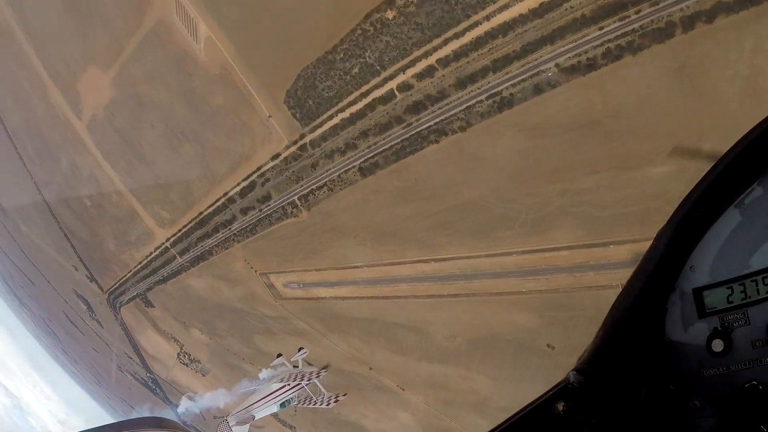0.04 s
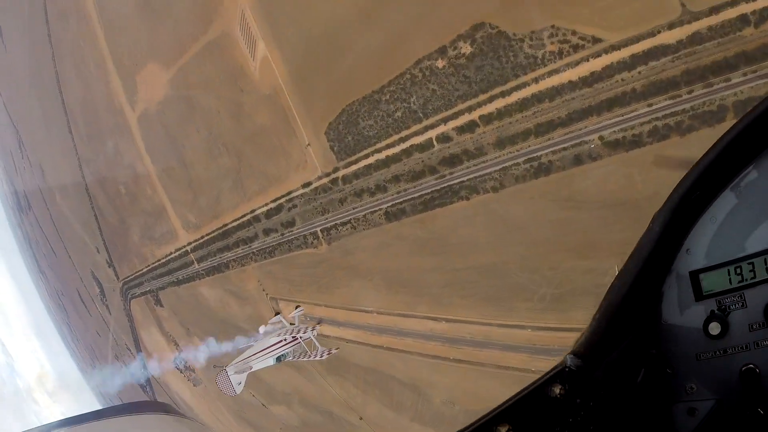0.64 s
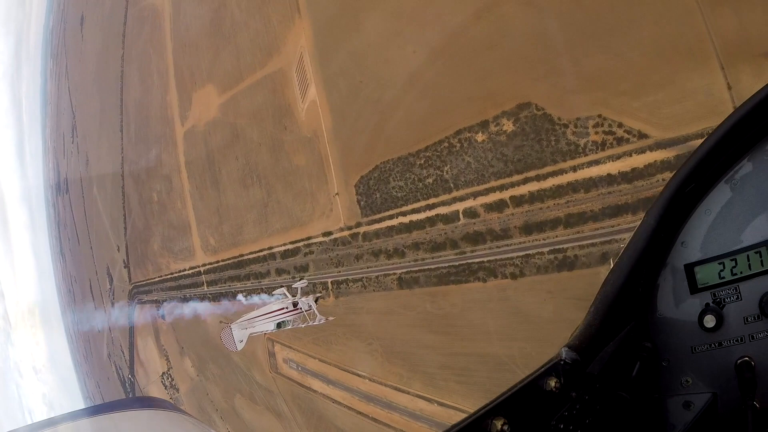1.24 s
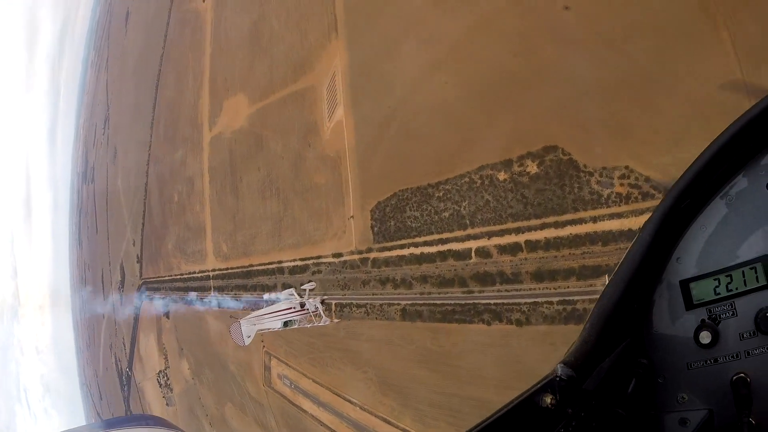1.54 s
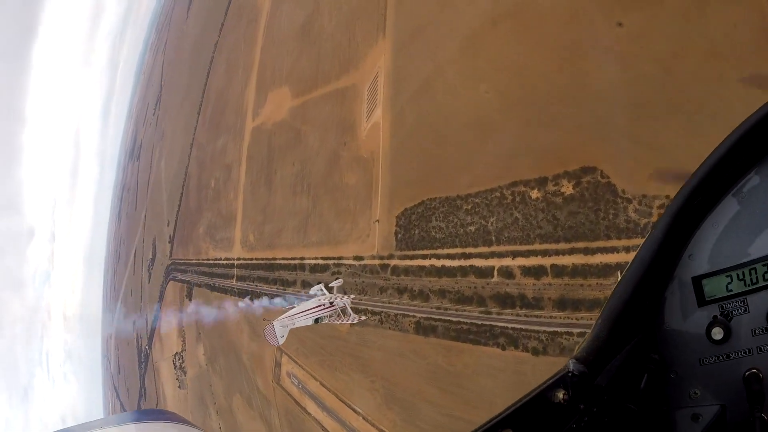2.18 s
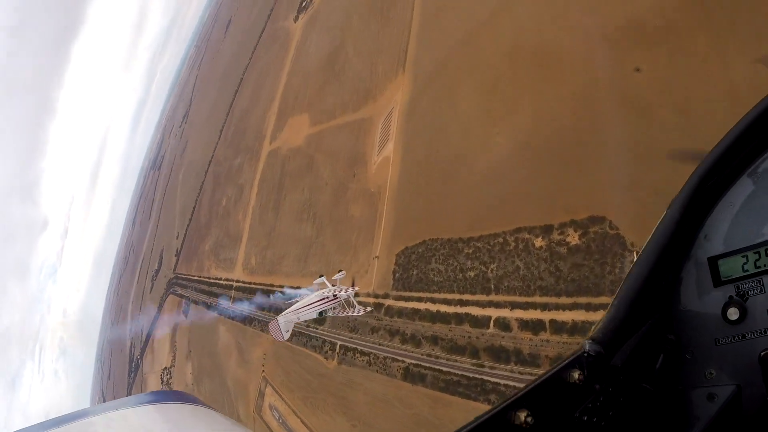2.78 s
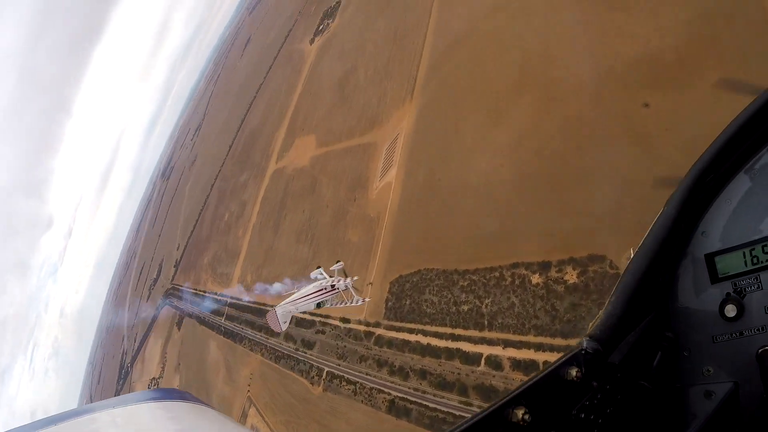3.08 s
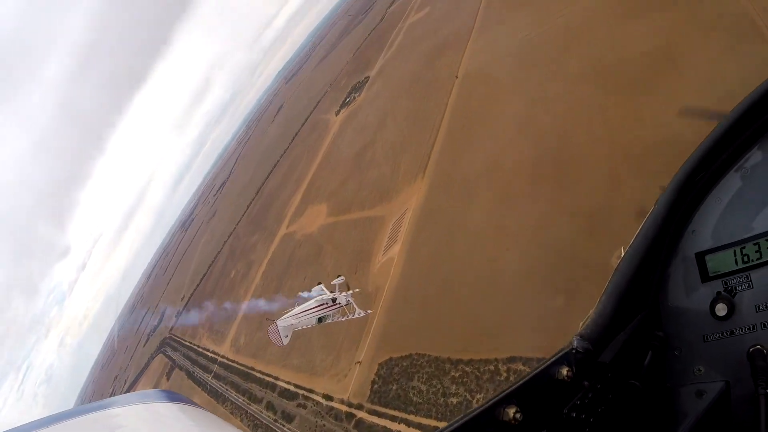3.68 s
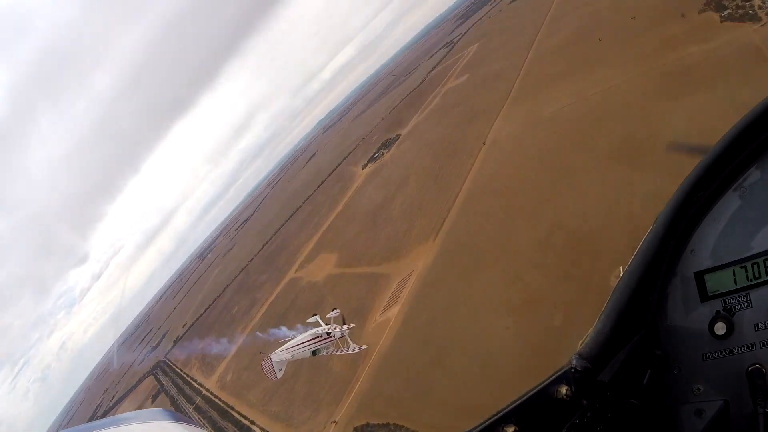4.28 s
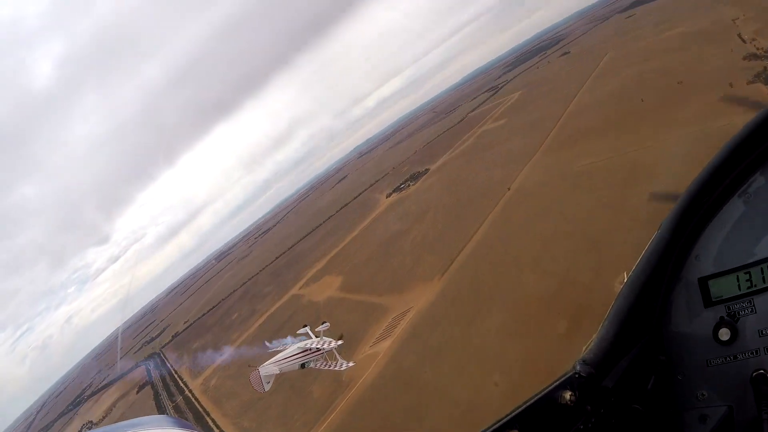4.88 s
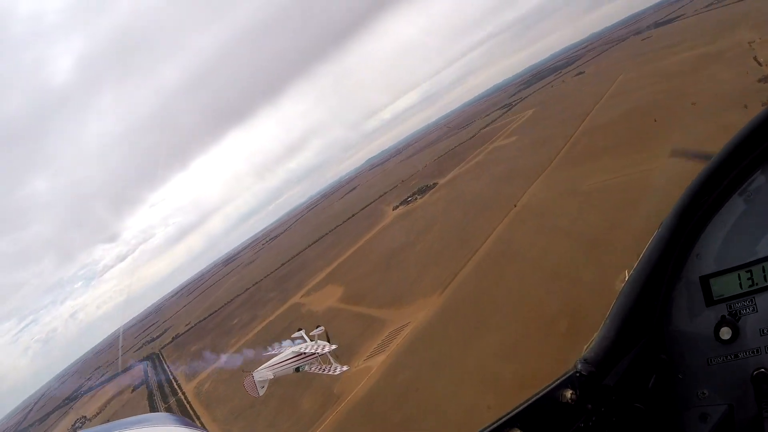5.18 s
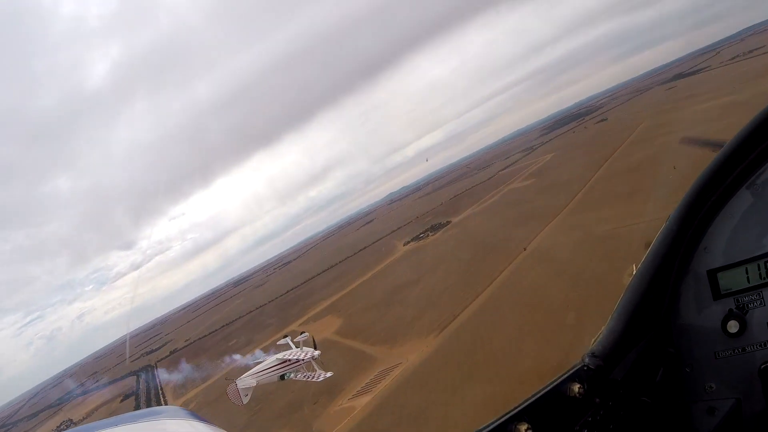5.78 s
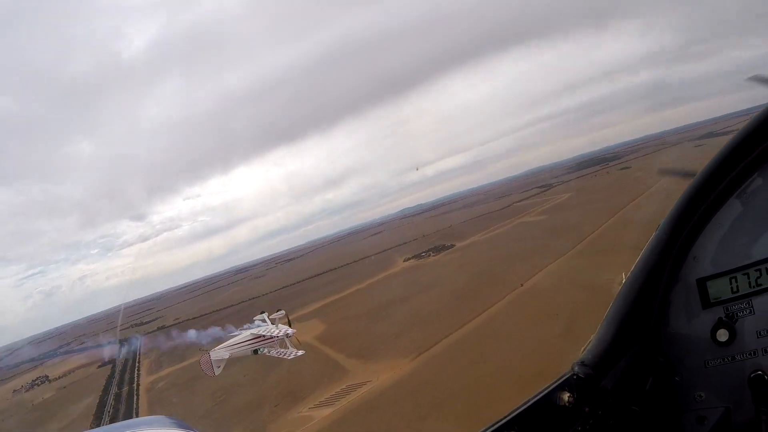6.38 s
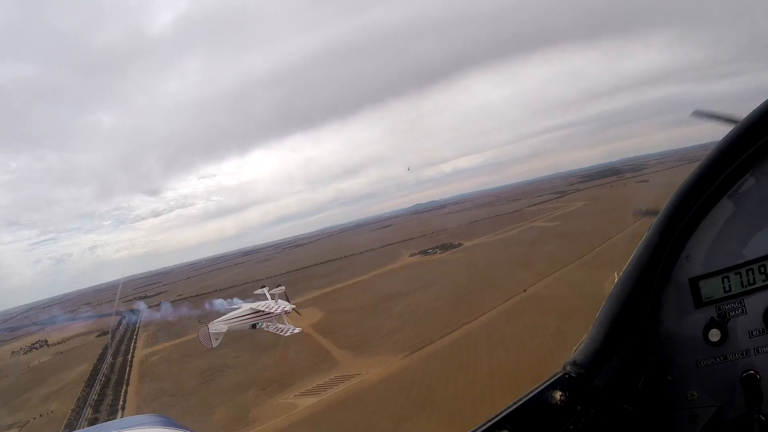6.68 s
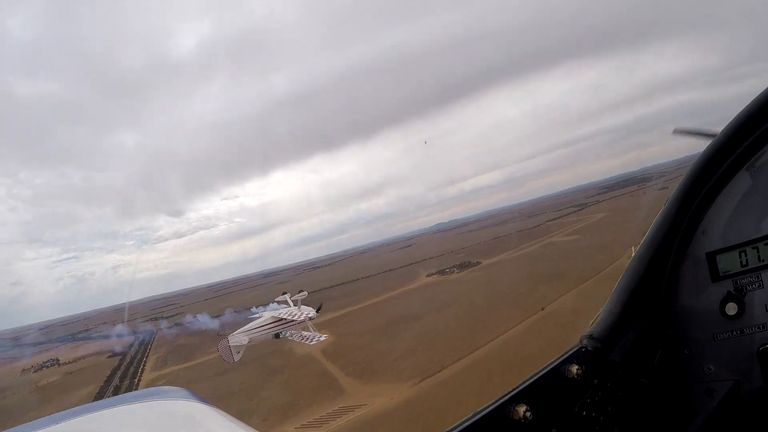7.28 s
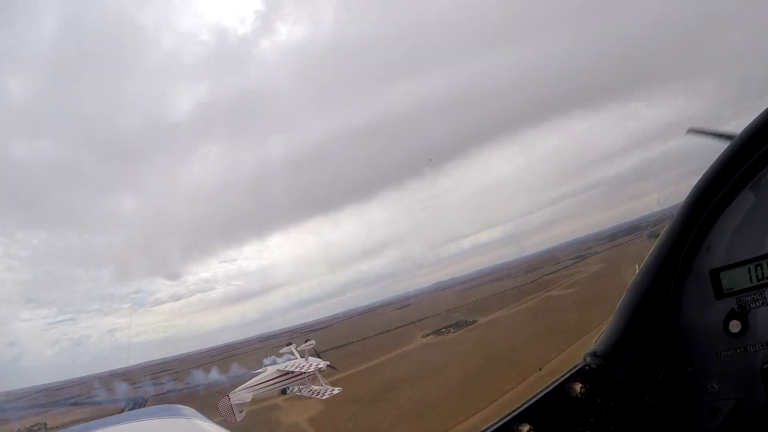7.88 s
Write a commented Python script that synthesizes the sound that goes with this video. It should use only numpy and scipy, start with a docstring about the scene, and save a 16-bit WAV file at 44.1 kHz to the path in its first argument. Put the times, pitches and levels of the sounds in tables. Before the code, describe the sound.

Inside the closed cockpit of a small aerobatic plane, a loud, low engine and propeller drone runs throughout, drifting gently down and up in pitch. Around it sits the close, steady roar of air over the fuselage and a raspy rush along the canopy. Turbulence thickens the rumble near the start and again near the end, while a high hiss of leaking air rises midway and stays.

```python
"""A piston engine and propeller drone in the closed cockpit of a light aerobatic aircraft in a roll.
Their tones are orders of one shaft, whose speed sags and recovers; uneven firings rumble in the cabin.
Turbulence buffets the fuselage, and the slipstream drives the resonances of the panels and canopy.
Air rushes from a vent and hisses through the canopy seal; a small camera limits the peaks."""
import sys
import numpy as np
from scipy import signal
from scipy.fft import rfft, irfft, next_fast_len
from scipy.io import wavfile
from scipy.ndimage import uniform_filter1d, minimum_filter1d, map_coordinates

SR = 44100
rng = np.random.default_rng(int(sys.argv[2]) if len(sys.argv) > 2 else 0)


def transcribe(u):
    """Save the signal u as a 16-bit wav file named by the first command-line argument.

    u: samples, shape (n,) or (channels, n), limited to [-1, 1]; the rate is SR.
    q: integer samples, one column per channel.
    """
    v = np.clip(np.atleast_2d(u).T, -1, 1)
    q = np.round(v * 32767).astype(np.int16)
    wavfile.write(sys.argv[1], SR, q)


N = 355005

# rotation frequency of the crankshaft: t/s, f/Hz
SHAFT_SPEED = [(0.0, 45.28), (0.2, 44.85), (0.95, 47.3), (1.4, 44.18), (1.85, 44.78), (2.25, 44.54),
               (2.5, 43.25), (3.05, 46.77), (3.25, 47.32), (3.55, 46.94), (4.2, 44.76), (4.45, 44.92),
               (4.95, 46.12), (5.6, 44.62), (6.45, 47.26), (7.15, 47.56), (7.6, 44.54), (8.05, 45.46)]
# turbulence shaking the airframe, and slipstream along it, relative to the usual: t/s, level/dB
TURBULENCE = [(0, -0.5), (0.6, 4.5), (1.3, -1.5), (2.05, -2.5), (2.75, -1.5), (3.2, 2), (3.5, -1),
              (3.9, 1.8), (4.45, -3), (5.25, 1), (5.6, -2.2), (6.05, 1.7), (6.6, -4), (7.2, -4), (7.45, 4),
              (7.62, -1.5), (7.88, 3.5), (8.05, 3)]
SLIPSTREAM = [(0, -2.3), (0.85, 1), (1.7, -2), (2.5, -2.5), (2.9, 1.5), (3.5, 2.7), (4.4, 1.8), (5.25, 2.5),
              (5.85, -0.8), (6.2, 0.5), (6.55, -2.2), (8.05, -1.3)]
# strong orders of the shaft: t/s, level/dB
BLADE_TONE = [(0.0, -15.5), (2.75, -13), (2.95, -16), (3.25, -26), (3.4, -18.5), (4.25, -13), (5.05, -16.4),
              (5.85, -11.6), (6.2, -20), (6.6, -16.5), (7.25, -16.4), (7.45, -29), (7.6, -16), (7.8, -17.5),
              (8.05, -35)]  # two blade passes a turn
THROB_TONE = [(0, -24), (0.65, -15), (1, -21), (2.3, -15.5), (2.45, -26), (2.85, -17.5), (3.25, -22.5),
              (4.1, -15), (5.6, -27.5), (6.8, -28), (7.35, -24), (8.05, -32)]  # half an order below the firings
FIRING_TONE = [(0, -22), (0.55, -25), (1.25, -10), (1.5, -16.5), (1.8, -13), (2.7, -22.5), (3.45, -12.5),
               (4, -18), (4.3, -13.5), (5.25, -16.5), (5.5, -13), (5.95, -19.5), (6.15, -10), (6.85, -11.5),
               (7.4, -15.5), (7.65, -13), (7.9, -19.5), (8.05, -14)]  # three firings a turn
SHARED_OVERTONE = [(0, -21), (0.7, -19.5), (1.2, -25), (1.65, -24.5), (2.35, -42), (3.3, -34), (3.7, -23.5),
                   (4.1, -26.5), (4.6, -22.5), (5.1, -40), (5.5, -22.5), (6.6, -23.5), (7.3, -30),
                   (8.05, -20.5)]  # common to blades and firings
BLADE_OVERTONE = [(0, -28), (0.45, -24), (0.8, -39), (8.05, -36)]  # fades early
# weak orders from cylinders that fire unequally: multiple of the shaft speed, level/dB
WEAK_ORDERS = [(.5, -43), (1.5, -28.5), (3.5, -28), (4.5, -28), (5, -31.5), (5.5, -37.5), (6.5, -31.5),
               (7, -37.5), (7.5, -34.5), (11, -38.5), (13, -38), (13.5, -37), (16, -42.5)]
# relative spectral densities of the noise sources: f/Hz, level/dB
EXHAUST_SPECTRUM = [(60, -33), (125, -6), (158, -1.5), (183, -0.5), (215, -1), (260, -6), (350, -12),
                    (460, -11), (700, -25), (1500, -58)]
BUFFET_SPECTRUM = [(8, -24), (22, -14), (44, -8), (64, -1), (85, -4.5), (125, -4.5), (170, -26), (300, -39)]
PANEL_SPECTRUM = [(150, -7.5), (330, -2), (520, -3), (640, -2.5), (680, -11.5), (820, -8), (1000, -8.5),
                  (1100, -16.5), (1400, -30), (2500, -50)]
CANOPY_SPECTRUM = [(700, -23), (1150, 2.5), (1250, 0.5), (1420, -3), (1950, 1), (2120, -5), (2500, -14.5),
                   (4500, -34.5)]
VENT_SPECTRUM = [(1000, -8.5), (2000, -2), (2550, -3), (2800, 0.5), (3250, -5.5), (3700, -7), (4500, -11.5),
                 (7000, -21), (11000, -35), (15000, -40)]
SEAL_SPECTRUM = [(2500, -35), (4700, -15), (5250, -3), (6000, -3), (6700, -0.5), (8200, -5), (9600, -14.5),
                 (11400, -27), (15000, -33)]
# resonances of the fuselage panels and the canopy: f/Hz, width/Hz, height above the spectrum/dB
PANEL_MODES = [(594, 53, 6), (626.5, 29, 4.5), (707, 28, 4.5), (877, 40, 4.5), (915, 66, 7), (973, 46, 4.5)]
CANOPY_MODES = [(1245, 58, 8.2), (1556, 38, 7.7), (1685, 40, 8.1), (1820, 45, 4), (1900, 50, 5.6),
                (2005, 45, 3.5), (2264, 99, 7.4), (2710, 90, 6.1), (2890, 90, 6.6), (3040, 80, 4)]
# rush from the vent, and hiss at the canopy seal: t/s, level/dB
VENT_RUSH = [(0, -33.5), (0.75, -32.5), (1.4, -39.2), (2.5, -38.2), (3, -34.8), (3.6, -35), (4.1, -37),
             (5.4, -37), (6.8, -38.5), (8.05, -36.6)]
SEAL_LEAK = [(0.0, -46), (0.8, -43.4), (1.5, -46), (3.5, -35), (3.7, -36), (5.1, -34.5), (6.8, -38.0),
             (8.05, -34.5)]
# jet through the seal: t/s, speed/usual speed
JET_SPEED = [(0, 0.92), (1.5, 0.96), (2.5, 0.935), (3.5, .98), (5, 1.02), (6.5, 1.036), (8.05, 1.01)]


def undb(db):
    """Amplitude ratio of a level in decibels."""
    return 10 ** (np.asarray(db) / 20)


def level(x, db=0):
    """Scaling to a given rms level."""
    return x * undb(db) / np.sqrt(np.mean(x ** 2))


def curve(table):
    """Linear interpolation of a time table at every sample."""
    return np.interp(np.arange(N) / SR, *np.transpose(table))


def walk(rate):
    """Slow random fluctuation of unit rms, with rate new values a second."""
    points = rng.standard_normal(2048)
    return level(np.interp(np.arange(N) / SR * rate, np.arange(len(points)), points))


def colour(x, spectrum, modes=()):
    """Source-filter shaping: a smooth spectrum with resonance peaks on top, at unit rms."""
    size = next_fast_len(N)
    f = np.maximum(np.arange(size // 2 + 1) * SR / size, 1)
    hz, db = np.transpose(spectrum)
    rolloff_db = 40 * np.log10(np.maximum(f / hz[-1], 1))
    gain_db = np.interp(np.log(f), np.log(hz), db) - rolloff_db
    for centre, width, boost in modes:
        gain_db += boost / (1 + (2 * (f - centre) / width) ** 2)
    return level(irfft(rfft(x, size) * undb(gain_db), size)[:N])


def order_tone(turns, order, lag_cycles, wobble_rad):
    """Phase modulation: turbulence perturbs a tone locked to a multiple of the shaft speed."""
    return np.sqrt(2) * np.sin(2 * np.pi * (order * turns - lag_cycles) + wobble_rad * walk(7))


def uneven_cylinders(turns, waver_db=3):
    """Half-order comb: unequal firings repeat once a four-stroke cycle, which takes two turns."""
    return sum(order_tone(turns, order, rng.random(), wobble_rad=0.28)
               * level(undb(waver_db * walk(4)), db) for order, db in WEAK_ORDERS)


def drone(turns, turbulence_db, flutter_db=0.83):
    """Periodic forcing: blades and firings radiate shaft orders; rough air adds shake and blade slap."""
    shake_db = -30 + 1.3 * turbulence_db
    slap_db = -26.5 + 0.65 * turbulence_db + 3 * walk(4)
    # order, level/dB, lag/cycles; the throb lags a quarter cycle, so it swirls rather than chugs
    orders = [(2, curve(BLADE_TONE), 0), (2.5, curve(THROB_TONE), 1 / 4), (3, curve(FIRING_TONE), 0),
              (1, shake_db, rng.random()), (4, slap_db, rng.random()),
              (6, curve(SHARED_OVERTONE), rng.random()), (8, curve(BLADE_OVERTONE), rng.random())]
    return sum(order_tone(turns, order, lag, wobble_rad=0.071) * undb(db + flutter_db * walk(12))
               for order, db, lag in orders)


def exhaust(turns, scatter=0.22, decay_cycles=0.58):
    """Pulse-modulated noise: three unequal bursts of gas a turn, dulled by the firewall."""
    firings = 3 * turns
    strength = 1 + scatter * rng.standard_normal(4096)[firings.astype(int)]
    bursts = strength * (0.5 + np.exp(-(firings % 1) / decay_cycles))
    return colour(bursts * rng.standard_normal(N), EXHAUST_SPECTRUM)


def turbulent_air(spectrum, flicker_db, flicker_hz):
    """Flow noise: turbulence gives a continuous spectrum whose level flickers."""
    return colour(rng.standard_normal(N), spectrum) * undb(flicker_db * walk(flicker_hz))


def ringing_shell(spectrum, modes, gust_db, flutter_db):
    """Forced resonance: the slipstream rings a thin shell, swelling in gusts and fluttering in eddies."""
    eddies = rng.standard_normal(N) * undb(flutter_db * walk(90))
    return colour(eddies, spectrum, modes) * undb(gust_db * walk(12))


def seal_jet(speed):
    """Strouhal scaling: the frequencies of the hiss rise in proportion to the speed of the jet."""
    jet = turbulent_air(SEAL_SPECTRUM, flicker_db=0.5, flicker_hz=35)
    return map_coordinates(jet, [np.cumsum(speed)], order=3, mode="mirror")


def scene():
    """Superposition under the canopy: turbulence drives the lows, the slipstream the two shells."""
    turns = np.cumsum(curve(SHAFT_SPEED)) / SR
    turbulence_db, stream_db, leak_db = curve(TURBULENCE), curve(SLIPSTREAM), curve(SEAL_LEAK)
    engine = uneven_cylinders(turns) + drone(turns, turbulence_db)
    rumble = exhaust(turns) * undb(-20 + 0.94 * turbulence_db)
    buffet = turbulent_air(BUFFET_SPECTRUM, flicker_db=1.0, flicker_hz=7.5)
    buffet *= undb(-22 + 1.5 * turbulence_db)
    panel_roar = ringing_shell(PANEL_SPECTRUM, PANEL_MODES, gust_db=0.05, flutter_db=0.47)
    panel_roar *= undb(-19 + 0.98 * stream_db)
    canopy_rasp = ringing_shell(CANOPY_SPECTRUM, CANOPY_MODES, gust_db=0.24, flutter_db=0.46)
    canopy_rasp *= undb(-29.2 + 0.57 * stream_db + 0.26 * (leak_db - leak_db.mean()))
    vent = turbulent_air(VENT_SPECTRUM, flicker_db=0.6, flicker_hz=30) * undb(curve(VENT_RUSH))
    hiss = seal_jet(curve(JET_SPEED)) * undb(leak_db)
    return (engine + rumble + buffet + panel_roar + canopy_rasp + vent + hiss)[None]


def limiter(x, ceiling=0.89, hold_s=0.0085):
    """Look-ahead limiting: the gain dips smoothly around every peak above the ceiling."""
    size = int(hold_s * SR)
    needed_gain = np.minimum(1, ceiling / (np.abs(x) + 1e-9))
    return x * uniform_filter1d(minimum_filter1d(needed_gain, size), size)


def record(dry):
    """Peak and band limiting in the camera; the sound eases in and out."""
    fade_s, cutoff_hz = 0.004, 15100
    samples_from_edge = np.minimum(np.arange(N), np.arange(N)[::-1])
    fade = np.minimum(1, samples_from_edge / (fade_s * SR))
    lowpass = signal.ellip(8, 0.2, 70, cutoff_hz, fs=SR, output="sos")
    return signal.sosfilt(lowpass, limiter(dry) * fade)


dry = scene()
out = record(dry)
transcribe(out)
```